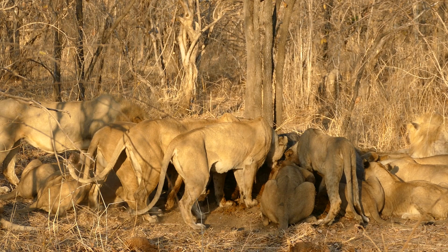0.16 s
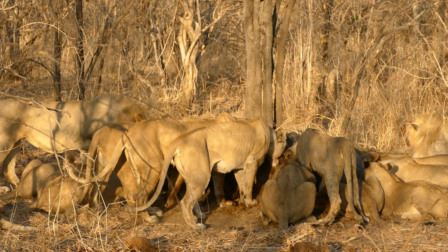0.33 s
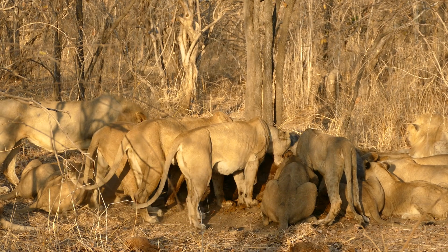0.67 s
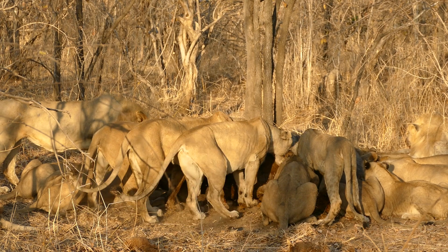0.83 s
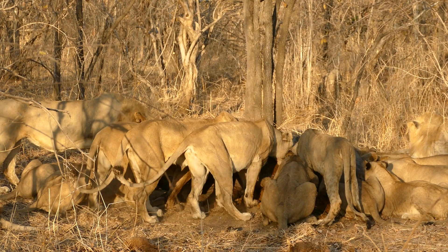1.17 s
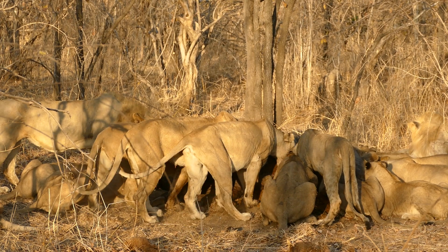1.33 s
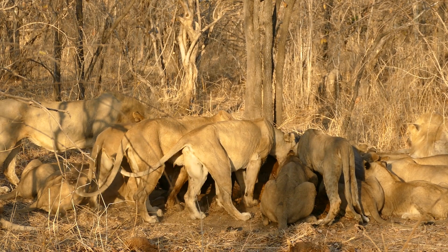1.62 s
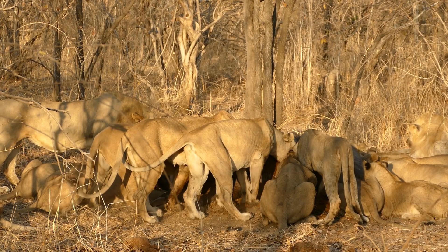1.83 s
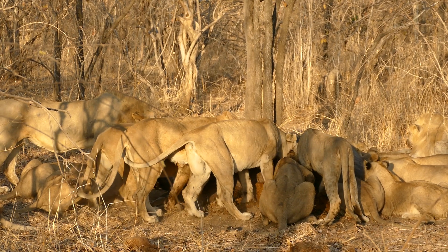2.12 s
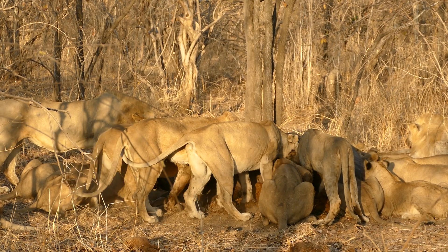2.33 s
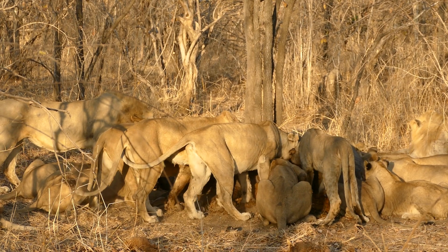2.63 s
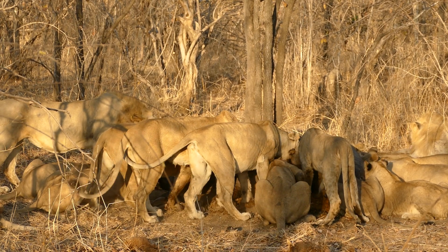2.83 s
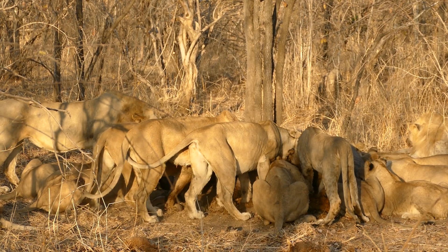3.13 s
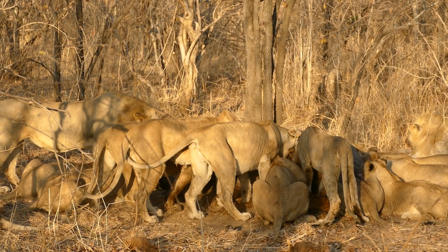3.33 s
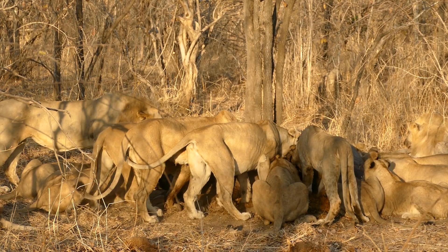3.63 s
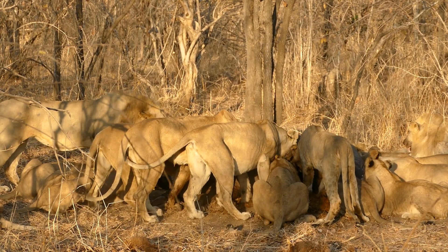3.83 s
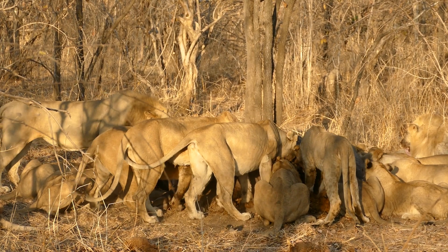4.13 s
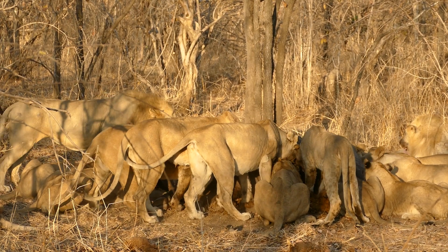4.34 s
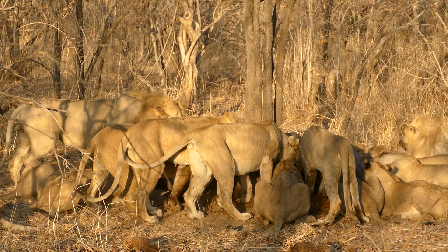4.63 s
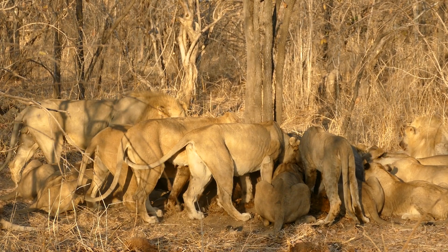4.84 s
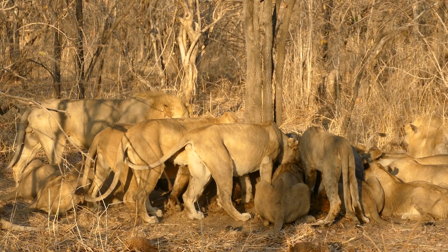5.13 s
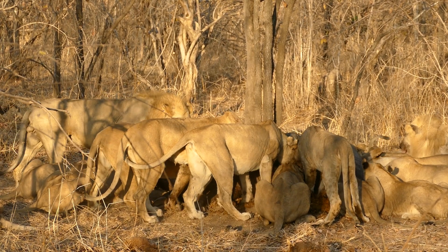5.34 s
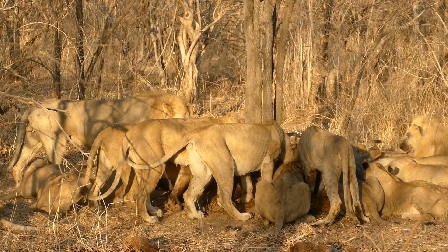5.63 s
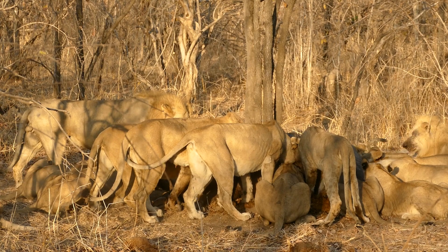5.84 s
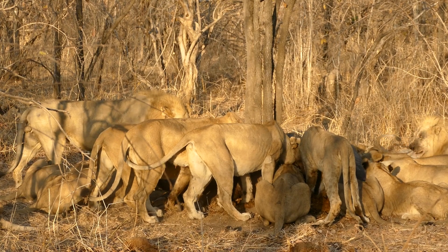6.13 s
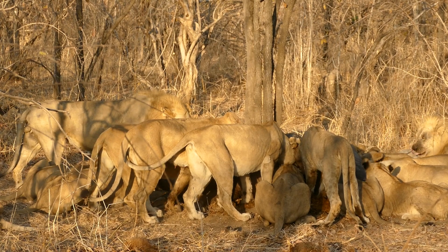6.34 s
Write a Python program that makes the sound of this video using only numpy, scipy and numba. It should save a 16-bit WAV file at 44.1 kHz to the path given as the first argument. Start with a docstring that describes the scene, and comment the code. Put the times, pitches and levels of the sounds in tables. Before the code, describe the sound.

Stereo outdoor sound of lions feeding close ahead in dry bush, with short, scattered echoes off trunks and a faint hiss of air, insects and grass. From 0 s, low growls flutter at about thirty pulses a second; a bark at 0.25 s and a strong snarl and moan around 0.35-0.5 s come with crackles that continue to 0.9 s. Thin bird chirps dot the first 1.5 s. Growls swell with moans at 1.2-1.6 s, crackling to 1.85 s. From 2.1 to 3.1 s, snarls, barks and longer moans overlap. Sparser growls follow, with chirps near 3-3.5 s and a swelling growl-snarl around 4.1 s. Hard throaty barks burst at 4.8 s, crackling to 5.05 s. A quick four-click rattle then leads to a clear rising whistle, slightly right, at 5.15-5.25 s. Rasping snarls and crackles return at 5.7-5.95 s; growling fades, with a last short growl and moan at 6.3 s.

```python
"""Growling comes first: lions crowd round a carcass in dry bush, snarling over each other.
Slow flaps of the vocal folds ring belly, chest and throat, and at times tighten into moans.
Rasping puffs ring the open mouth and break out as ringing tones, crackles and barks.
Noise bursts make short dry clicks, gliding tones call as small birds, and sparse echoes off
the trees scatter all of these over a faint hiss of air, insects and dry grass."""
import sys
import numpy as np
from scipy import signal
from scipy.fft import rfft, irfft
from scipy.io import wavfile
from scipy.ndimage import uniform_filter1d
from numba import njit

SR = 44100
rng = np.random.default_rng(int(sys.argv[2]) if len(sys.argv) > 2 else 0)


def to_wav(s):
    """Save 16-bit WAV."""
    ch = np.atleast_2d(s).T  # columns
    pcm = np.round(np.clip(ch, -1, 1) * 32767)  # PCM
    wavfile.write(sys.argv[1], SR, pcm.astype(np.int16))


N = 285768

# Table levels are source levels, before the mix gains in the functions.
# Growls: start_s, crest_s, end_s, crest_db, swell_db, fade_db, flap_rate_hz, belly_boost_db,
# throat_db (relative to chest)
GROWL_CALLS = [(0.0, 0.006, 0.14, -45, -0.5, 4, 32.8, 3.5, -14.5),
               (0.153, 0.263, .33, -39.5, 4, 7, 33.4, 3.5, -10.5),
               (.336, 0.398, 0.45, -37, 1, 7, 39.2, 3.5, -10.5),
               (.512, 0.526, .72, -46.5, -1, 4.5, 29, -6, -16),
               (.761, 0.807, 0.93, -44.5, 7.5, 4.5, 28.7, 2, -7.5),
               (1.008, 1.071, 1.114, -41, 12.5, 27, 36, 7.5, -6.5),
               (1.175, 1.48, 1.653, -38, 9.5, 4.5, 38, 1, -7.5),
               (1.668, 1.74, 2, -47.5, 2.5, 0, 24.6, 3, -17.5),
               (1.932, 2.177, 2.3, -39, 12, 13, 33.4, 4.5, -6.5),
               (2.315, 2.358, 2.64, -37.5, -1, 5.5, 40, 2, -7.5),
               (2.705, 2.84, 3.01, -40.5, 1, 16, 37, 1, -10.5),
               (3.196, 3.339, 3.56, -43.5, 8, 10.5, 36, -4, -19),
               (3.535, 3.601, 3.65, -50.5, 3.5, -1.5, 28.6, 5.5, -7),
               (3.798, 4.095, 4.25, -38, 10, 4, 34.2, -8, -14),
               (4.564, 4.616, 4.76, -40.5, 3, 11.5, 36.6, -6, -11),
               (4.764, 4.907, 5.09, -40.5, -2.5, 14, 29.4, -5.5, -8),
               (5.2, 5.21, 5.54, -55, -4.5, 3, 32.7, 3, -8.5),
               (5.487, 5.513, 5.56, -38.5, 5, 5, 33, -9.5, -5),
               (5.606, 5.781, 6.1, -45.5, 3, 8.5, 27.5, 0.5, -17),
               (6.3, 6.363, 6.43, -41.5, 10.5, 17, 31.6, -6, -13.5)]
# Snarls: start_s, crest_s, end_s, crest_db, swell_db, fade_db, puff_rate_hz, puff_decay_s,
# teeth_rasp_db, jaw_hz
SNARL_CALLS = [(0.345, 0.382, 0.47, -37, 5, 11, 50, 0.012, -10, 761),
               (0.508, .515, 0.6, -52, -6.5, 3, 24.5, 0.013, -7.5, 704),
               (1.165, 1.3, 1.47, -58, 4, 7, 27.3, 0.019, 0, 740),
               (1.409, 1.462, 1.704, -46, 7, 6.5, 35.4, 0.016, -6, 863),
               (2.146, 2.182, 2.38, -43, 7, 28, 32, 0.018, -6.5, 708),
               (2.372, 2.54, 2.674, -47.5, 9, 3.5, 24.5, 0.024, -6.5, 787),
               (2.712, 2.785, 3.06, -42.5, -2, 33, 29, 0.024, -10.5, 655),
               (3.074, 3.12, 3.38, -58, 3, 36, 38.8, 0.011, -20, 1000),
               (3.283, 3.42, 3.7, -48, 10, 33, 25.8, 0.011, -6, 796),
               (3.947, 4.2, 4.28, -47.5, 17.5, 9, 24.1, 0.014, -6.5, 785),
               (4.77, 4.833, 4.9, -45.5, 4, 18, 30.7, 0.01, -7.5, 1018),
               (4.906, 4.947, 5.07, -42.5, 9, -2, 26.5, 0.02, -22, 943),
               (5.682, 5.704, 5.775, -44, 3, -3, 48, 0.011, -11, 797),
               (5.789, 5.83, 5.9, -38, 3, 11, 25, 0.019, -17, 965)]
# Moans: start_s, end_s, first_pitch_hz, last_pitch_hz, level_db
MOAN_TONES = [(.35, 0.435, 181.5, 156, -32.5), (1.199, 1.537, 141.5, 153, -41.5),
              (2.33, 2.522, 136.4, 184, -37.5), (2.47, 2.916, 155.7, 133.9, -40),
              (1.196, 1.62, 106.7, 115, -46), (2.5, 2.986, 115.1, 113.8, -45.5),
              (3.045, 3.148, 330.6, 354.5, -49), (4.001, 4.277, 135.9, 132.8, -46),
              (5.49, 5.559, 183.6, 208.8, -56), (6.315, 6.428, 213, 149.9, -45)]
# Resonances that sing out of the snarls: start_s, end_s, pitch_hz, level_db
RING_TONES = [(0.282, 0.42, 1280, -48.5), (0.416, .535, 969, -47), (0.496, .625, 635.4, -44.5),
              (1.425, 1.532, 425.5, -36), (1.435, 1.525, 1504, -44.5), (2.179, 2.228, 417.6, -34),
              (2.736, 2.873, 639.4, -40.5), (4.906, 4.943, 828.7, -35.5)]
# Crackles, single sharp pulses: time_s, mouth_db, mouth_hz, teeth_rasp_db
CRACKLE_PULSES = [(0.091, -36, 738, -47), (0.156, -33.5, 754, -44), (0.19, -36, 670, -47),
                  (0.332, -32.5, 760, -53), (0.36, -28.5, 790, -52), (0.504, -32.5, 680, -53),
                  (0.592, -39.5, 640, -61), (0.653, -43.5, 730, -50), (0.687, -46, 764, -48.5),
                  (0.726, -46, 696, -43), (0.759, -47, 660, -46.5), (0.803, -45, 668, -48),
                  (0.831, -41.5, 736, -39.5), (1.453, -33, 900, -41.5), (1.493, -35.5, 920, -43),
                  (1.519, -40, 650, -51), (1.676, -36.5, 730, -47.5), (1.711, -34, 905, -45),
                  (1.752, -33.5, 737, -40.5), (1.792, -36.5, 729, -44), (1.833, -41, 748, -46),
                  (2.579, -37.5, 1001, -62), (4.864, -33.5, 950.5, -58), (4.942, -29.5, 834, -64),
                  (4.99, -32.5, 942, -62), (5.023, -32.5, 929, -54), (5.753, -34, 770, -52),
                  (5.828, -27.5, 910, -55), (5.868, -31, 781.4, -51), (5.919, -34, 1010, -48)]
# Barks: time_s, throat_db, throat_hz, mouth_db, mouth_hz, decay_s
BARK_SHOVES = [(.25, -29.5, 164, -38, 795, 0.0062), (2.182, -43, 434, -36.5, 674, 0.016),
               (2.716, -44, 347, -36, 1128, 0.0096), (2.822, -35, 219.7, -42, 650, 0.006),
               (3.077, -42.5, 362, -55.5, 1030, 0.049), (3.855, -35.5, 465.5, -49, 650, 0.0035),
               (4.194, -41, 250.3, -42, 1240, 0.005), (4.77, -36.5, 375.4, -45.5, 948.6, 0.023),
               (4.803, -22.5, 410, -41, 780, 0.0073), (4.83, -27, 412.3, -37.5, 920, 0.0071)]
# Short dry clicks (twig-like snaps, a rasp tick, a four-click bird rattle):
# time_s, level_db, centre_hz, decay_s
CLICK_BURSTS = [(0.154, -56.5, 2570, 0.0091), (.191, -51.5, 9700, 0.0033), (2.354, -61, 8150, 0.0033),
                (4.647, -58, 9400, 0.029), (5.04, -51.5, 6540, 0.0066), (5.055, -50.5, 5830, 0.0052),
                (5.067, -53, 6440, 0.0048), (5.077, -50.5, 5840, 0.0073), (5.609, -61.5, 3005, 0.025),
                (5.942, -61, 9517, 0.012)]
# Close bird's rising whistle: time_s, pitch_hz, level_db
WHISTLE_PATH = [(5.135, 4810, -62), (5.155, 5443, -44), (5.159, 4520, -51.5), (5.17, 4774, -37.5),
                (5.19, 4857, -35), (5.208, 4996, -37), (5.222, 5643, -34), (5.235, 5880, -44.5),
                (5.245, 6143, -62)]
# Birds further off: start_s, length_s, first_hz, middle_hz, last_hz, level_db
CHIRP_NOTES = [(0.095, 0.067, 4030, 4120, 4230, -57.5), (0.135, 0.063, 4880, 5500, 6200, -65),
               (0.21, 0.07, 6220, 4700, 4910, -57.5), (0.403, 0.073, 4718, 5430, 4970, -58),
               (0.609, 0.057, 4300, 4546, 4320, -55.5), (0.64, 0.052, 5940, 6180, 5470, -59),
               (0.664, 0.056, 4840, 4396, 4620, -51.5), (0.71, 0.038, 6200, 5780, 5750, -60),
               (1.291, 0.076, 3860, 4730, 4180, -65.5), (1.36, 0.041, 4120, 4223, 4310, -58.5),
               (1.454, 0.037, 4050, 4105, 4260, -55.5), (2.975, 0.083, 4157, 4201, 4437, -59),
               (3.088, 0.033, 4876, 4738, 4750, -74), (3.299, 0.066, 4530, 4310, 4200, -60.5),
               (3.365, 0.1, 5103, 5874, 5456, -67.5), (3.376, 0.05, 3790, 3870, 4300, -66),
               (3.438, 0.138, 5363, 5230, 5280, -59.5)]
# Dry grass rustle: time_s, level_db
GRASS_LEVELS = [(0, -76.5), (.7, -79), (1.0, -76.5), (1.4, -80.5), (2.5, -83.5), (3.1, -78.5),
                (3.62, -73.5), (3.9, -79), (4.6, -72.5), (5.75, -78.5), (6.48, -83)]
# Chest resonance outline: frequency_hz, relative_db
CHEST_OUTLINE = [(30, -64.5), (48, -61), (70, -14.5), (100, -5), (135, 0.5), (170, -2), (230, 0),
                 (280, -9.5), (380, -17.5), (560, -36.5), (900, -70.5), (4000, -87)]
# Throat resonance outline: frequency_hz, relative_db
THROAT_OUTLINE = [(180, -40.5), (300, -2.5), (360, 0), (385, -9.5), (415, 9.5), (470, -3.5), (570, -30.5),
                  (900, -59.5), (4000, -91.5)]
# Open-mouth resonance outline: frequency_hz, relative_db
MOUTH_OUTLINE = [(350, -28.5), (570, -26.5), (635, 6), (780, -1), (880, -2), (1020, 5), (1150, -7),
                 (1290, -0.5), (1420, -27), (2000, -35), (4000, -48)]
# Bared-teeth rasp outline: frequency_hz, relative_db
TEETH_OUTLINE = [(900, -18), (1350, -10), (1510, 11.5), (1630, -3), (1820, 7), (2080, 3.5), (2450, -13),
                 (2660, -23), (3400, -14.5), (6000, -28.5), (14000, -33)]
# Still air over the bush, spectrum outline: frequency_hz, relative_db
BUSH_OUTLINE = [(25, -34.5), (114, -4), (219, -2.5), (307, -12.5), (443, -9.5), (575, -23), (709, -8),
                (874, -17.5), (1910, -23.5), (2990, -35.5), (10200, -60.5), (15500, -47)]

BUSH_DB = -53.5
BELLY_HZ, BELLY_WIDTH_HZ = 87.0, 95.0
# Slack folds flap less evenly: roughness (0-1) at a firm growl's crest, and its rise per dB below
FIRM_DB, FIRM_ROUGH, ROUGH_PER_DB = -37, .14, 0.06
# Covering the teeth rounds the lips: rasp level at half rounding, dB of rounding per dB less rasp
HALF_ROUND_DB, ROUNDING_DB_PER_DB = -11, 2.1
TOP_HZ = 15100


def growls():
    """Slack vocal folds flap about thirty times a second and ring belly, chest and throat."""
    starts, _, ends, crest_db, *_, belly, throat = np.transpose(GROWL_CALLS)
    roughness = FIRM_ROUGH + ROUGH_PER_DB * (FIRM_DB - crest_db)
    calls = [(*call, .016, rough) for (*call, _, _), rough in zip(GROWL_CALLS, roughness)]
    folds = flaps(calls, jitter_s=0.0028, scatter_db=1.57, attack_s=0.00017)
    # the chest takes a cycle or two to swell after each flap (an all-pass)
    swollen = folds - 2 * svf(folds, np.full(N, 160.), 135.0)
    belly_gain = undb(by_phrase(starts, ends, belly)) - 1
    deep = belly_gain * svf(swollen, np.full(N, BELLY_HZ), BELLY_WIDTH_HZ)
    chest_sound = colour(swollen + deep, CHEST_OUTLINE)
    throat_sound = colour(folds * undb(by_phrase(starts, ends, throat)), THROAT_OUTLINE)
    return undb(0.5) * chest_sound + undb(-1.0) * throat_sound


def snarls():
    """Puffs of air ring the open mouth; the jaw moves its resonance and bared teeth add rasp."""
    starts, _, ends, *_, teeth, hz = np.transpose(SNARL_CALLS)
    calls = [(*call, .97) for *call, _, _ in SNARL_CALLS]
    air = flaps(calls, jitter_s=0.000794, scatter_db=1.94, attack_s=0.0011)
    teeth_db = by_phrase(starts, ends, teeth)
    jaw_hz = by_phrase(starts, ends, hz)
    # rounded lips gather the sound into the one jaw resonance
    focus = undb(ROUNDING_DB_PER_DB * (HALF_ROUND_DB - teeth_db))
    jaw = resonate(air, jaw_hz, width_hz=90)
    mouth = (colour(air, MOUTH_OUTLINE) + focus * jaw) / np.hypot(1, focus)
    rasp = air * undb(teeth_db)
    # narrow upper mouth resonances ride along with the jaw
    upper = resonate(rasp, 1.7 * jaw_hz, width_hz=52)
    upper += undb(-13.5) * resonate(rasp, 2.68 * jaw_hz, width_hz=50)
    return undb(-2.5) * mouth + undb(-4.0) * colour(rasp, TEETH_OUTLINE) + undb(-6.0) * upper


def moans():
    """The folds tighten into a dark, unsteady tone that swells and fades."""
    track = np.zeros(N)
    wobble_hz = 5.4 * waver(size=400)
    throb = undb(2.0 * waver(size=400))
    for start_s, end_s, first_hz, last_hz, db in MOAN_TONES:
        i = np.arange(int(start_s * SR), int(end_s * SR))
        hz = np.linspace(first_hz, last_hz, len(i)) + wobble_hz[i]
        phase = 2 * np.pi * np.cumsum(hz) / SR
        tone = np.sin(phase) + undb(-12.0) * np.sin(2 * phase) + undb(-22.5) * np.sin(3 * phase)
        swell = np.sqrt(2 * np.hanning(len(i)))
        add(track, start_s, undb(db) * swell * throb[i] * tone)
    return track


def rings():
    """Throat or mouth holds its shape and one narrow resonance sings out of the rasp, as a sine."""
    track = np.zeros(N)
    wobble = .016 * waver(size=120)
    throb_db = 3.5 * waver(size=250)
    for start_s, end_s, hz, db in RING_TONES:
        i = np.arange(int(start_s * SR), int(end_s * SR))
        phase = 2 * np.pi * np.cumsum(hz * (1 + wobble[i])) / SR
        add(track, start_s, undb(db + throb_db[i]) * signal.windows.tukey(len(i)) * np.sin(phase))
    return track


def crackles():
    """The folds snap once: a slap rings mouth and teeth; soft flesh swallows the treble."""
    track = np.zeros(N)
    for s, mouth_db, mouth_hz, teeth_db in CRACKLE_PULSES:
        slap = puff(decay_s=0.0092, rough=0.43)
        mouth = resonate(slap, mouth_hz, width_hz=310)
        teeth = resonate(slap, 1760, width_hz=1100)
        add(track, s, crest_at(mouth, mouth_db - .3) + crest_at(teeth, teeth_db + 3.0))
    return signal.sosfilt(signal.butter(7, 2150, fs=SR, output="sos"), track)


def barks():
    """Sudden hard shoves of air ring throat and mouth at once."""
    track = np.zeros(N)
    for s, throat_db, throat_hz, mouth_db, mouth_hz, decay_s in BARK_SHOVES:
        size = np.sqrt(decay_s * SR)
        mouth_air = size * puff(decay_s, rough=1.0)
        mouth = resonate(mouth_air, mouth_hz, width_hz=260)
        mouth += undb(-50) * colour(mouth_air, TEETH_OUTLINE)
        throat = resonate(size * puff(decay_s, rough=0.87), throat_hz, width_hz=132)
        add(track, s, undb(throat_db) * throat + undb(mouth_db) * mouth)
    return track


def clicks():
    """Short dry clicks: decaying noise bursts through a broad resonance."""
    track = np.zeros(N)
    for s, db, hz, decay_s in CLICK_BURSTS:
        burst = resonate(puff(decay_s, rough=1.0), hz, width_hz=0.95 * hz)
        add(track, s, undb(db) * np.sqrt(decay_s * SR) * burst)
    return track


def near_bird():
    """One upslurred whistle with its octave and a slight random flutter."""
    hz, db = curves(WHISTLE_PATH)
    t = np.arange(N) / SR
    flutter = 0.0096 * unit(uniform_filter1d(rng.standard_normal(N), size=60))
    phase = 2 * np.pi * np.cumsum(hz * (1 + flutter)) / SR
    sounding = (t > WHISTLE_PATH[0][0]) * (t < WHISTLE_PATH[-1][0])
    return sounding * undb(db) * (np.sin(phase) + undb(-17.5) * np.sin(2 * phase))


def far_birds():
    """Thin gliding notes with a faint octave; wide glides flutter more, twigs on the way blur each."""
    track = np.zeros(N)
    for s, length_s, first_hz, middle_hz, last_hz, db in CHIRP_NOTES:
        u = np.linspace(0, 1, int(length_s * SR))
        flutter = unit(uniform_filter1d(rng.standard_normal(SR // 4), size=50))[:len(u)]
        hz = np.polyval(np.polyfit([0, .5, 1], [first_hz, middle_hz, last_hz], 2), u)
        hz = hz + (25 + 0.11 * np.ptp(hz)) * flutter
        phase = 2 * np.pi * np.cumsum(hz) / SR
        level = undb(db + 2 * flutter) * np.sqrt(np.abs(np.sin(np.pi * u)))
        note = level * (np.sin(phase) + undb(-20.0) * np.sin(2 * phase))
        add(track, s, signal.fftconvolve(note, puff(.015, .25)))
    return track


def background():
    """Filtered noises: still air over the bush, a thin insect band, grainy rustling grass."""
    (grass_db,) = curves(GRASS_LEVELS)
    grain_db = np.repeat(rng.exponential(size=N // 64 + 1), 64)[:N]
    grains = unit(rng.standard_normal(N) * undb(grain_db))
    grass = colour(grains, [(2000, -18.0), (4000, 0.5), (6000, 0.0), (8200, -4.5),
                            (10000, 1.0), (12500, -6.5), (15500, -15.5)])
    insects = resonate(rng.standard_normal(N), 6770, width_hz=380)
    air = colour(rng.standard_normal(N), BUSH_OUTLINE)
    return undb(BUSH_DB) * air + undb(grass_db + 5.0) * grass + undb(-84) * insects


def trees(x, t60_s, wet_db, side_db, gap_s):
    """Direct sound plus sparse decaying echoes off the trunks, which fade in around gap_s."""
    t = np.arange(SR) / SR
    echoes = rng.standard_normal((2, SR)) * (rng.random((2, SR)) < .05)
    tails = echoes * undb(-60 * t / t60_s) * np.clip(t / gap_s - .5, 0, 1)
    mid, side = (signal.fftconvolve(x, h / np.linalg.norm(h))[:N] * undb(wet_db) for h in tails)
    return spread(x + mid, undb(side_db) * side)


def spread(mid, side):
    """Left and right; close microphones hear the bass alike, so the difference loses its lows."""
    side = signal.sosfilt(signal.butter(3, 520, "high", fs=SR, output="sos"), side)
    return np.array([mid + side, mid - side])


def flaps(calls, jitter_s, scatter_db, attack_s):
    """Uneven trains of puffs that swell to a crest and fade."""
    track = np.zeros(N)
    for start, crest, end, db, swell_db, fade_db, rate_hz, decay_s, rough in calls:
        for s in np.arange(start, end, 1 / rate_hz):
            late, size = rng.standard_normal(2)
            effort_db = np.interp(s, [start, max(crest, start), end],
                                  [db - swell_db, db, db - fade_db])
            gain = undb(effort_db + scatter_db * size) * np.sqrt(SR / rate_hz)
            add(track, s + jitter_s * rough * late, gain * puff(decay_s, rough, attack_s))
    return track


def puff(decay_s, rough, attack_s=.0001):
    """A slap, then turbulence that builds and dies; about unit energy, the share rough is noise."""
    t = np.arange(SR // 5) / SR
    rough = np.clip(rough, 0, 1)
    shape = np.exp(-t / decay_s) * np.minimum(t / attack_s, 1)
    spectrum = rfft(rng.standard_normal(len(t)) * shape)
    # partly flatten the spectrum: only mild chance colour remains
    flat = spectrum / np.sqrt(uniform_filter1d(np.abs(spectrum), size=16) + 1e-12)
    air = irfft(flat, len(t)) * np.clip(2 - 4 * t / t[-1], 0, 1)
    air *= np.sqrt(rough) / np.linalg.norm(air)
    air[0] += np.sqrt(1 - rough)
    return air


def colour(x, points):
    """Causal minimum-phase filter of unit energy with the given (Hz, dB) outline."""
    size = 8192
    hz, db = np.transpose(points)
    grid_hz = np.maximum(np.fft.rfftfreq(size, 1 / SR), 1)
    cepstrum = irfft(np.log(undb(np.interp(np.log(grid_hz), np.log(hz), db))))
    # fold the cepstrum forward in time
    cepstrum[1:size // 2] *= 2
    cepstrum[size // 2 + 1:] = 0
    ring = irfft(np.exp(rfft(cepstrum)))
    return signal.fftconvolve(x, ring / np.linalg.norm(ring))[:len(x)]


@njit
def svf(x, hz, width_hz):
    """State-variable band-pass with a moving centre."""
    y, band, low = np.empty(len(x)), 0., 0.
    for i in range(len(x)):
        g, k = np.tan(np.pi * hz[i] / SR), width_hz / hz[i]
        v = (band + g * (x[i] + 1e-18 - low)) / (1 + g * (g + k))
        band, low, y[i] = 2 * v - band, low + 2 * g * v, k * v
    return y


def resonate(x, hz, width_hz):
    """A steep resonance (two in a row) that keeps the power of white noise."""
    centre_hz = np.minimum(hz, .45 * SR) * np.ones(len(x))
    once = svf(x, centre_hz, float(width_hz))
    return svf(once, centre_hz, float(width_hz)) * np.sqrt(2 * SR / (np.pi * width_hz))


def crest_at(x, db):
    """Scale a short sound so that its loudest few milliseconds have this level."""
    return x * undb(db) / np.sqrt(uniform_filter1d(x ** 2, size=176).max())


def by_phrase(starts, ends, values):
    """A control that holds one value per phrase and glides between phrases."""
    return np.interp(np.arange(N) / SR, np.ravel([starts, ends], "F"), np.repeat(values, 2))


def curves(rows):
    """One value per sample for each column after time_s."""
    s, *columns = np.transpose(rows)
    return [np.interp(np.arange(N) / SR, s, c) for c in columns]


def waver(size):
    """Smooth random wander of rms 1, averaged twice over size samples."""
    return unit(uniform_filter1d(uniform_filter1d(rng.standard_normal(N), size), size))


def unit(x):
    """Scale to rms 1."""
    return x / np.sqrt(np.mean(x ** 2) + 1e-20)


def undb(db):
    """Decibels to gain."""
    return 10 ** (np.asarray(db) / 20)


def add(track, s, sound):
    """Mix a sound into the track at time s."""
    i = int(np.clip(s * SR, 0, N - 1))
    track[i:i + len(sound)] += sound[:N - i]


def scene():
    """Lions ahead, birds around them in the trees."""
    voices = growls() + moans() + snarls() + rings() + barks() + crackles()
    lions = trees(voices, t60_s=0.34, wet_db=-10.0, side_db=-5.5, gap_s=0.0055)
    dry_clicks = trees(clicks(), t60_s=.35, wet_db=-8, side_db=-8, gap_s=.008)
    whistle = trees(near_bird(), t60_s=0.46, wet_db=-8.5, side_db=-10, gap_s=0.0044)
    whistle = whistle * undb(np.array([[-1.2], [1.2]]))  # right of centre
    chirps = trees(far_birds(), t60_s=.72, wet_db=-3.5, side_db=-8, gap_s=.006)
    bush = spread(background(), undb(-6.0) * background())
    return lions + chirps + whistle + dry_clicks + bush


def record(dry):
    """The recorder cuts the deepest bass and the top."""
    dry = signal.sosfilt(signal.butter(2, 35, "high", fs=SR, output="sos"), dry)
    return signal.sosfilt(signal.ellip(8, .2, 70, TOP_HZ, fs=SR, output="sos"), dry)


dry = scene()
out = record(dry)
to_wav(out)
```